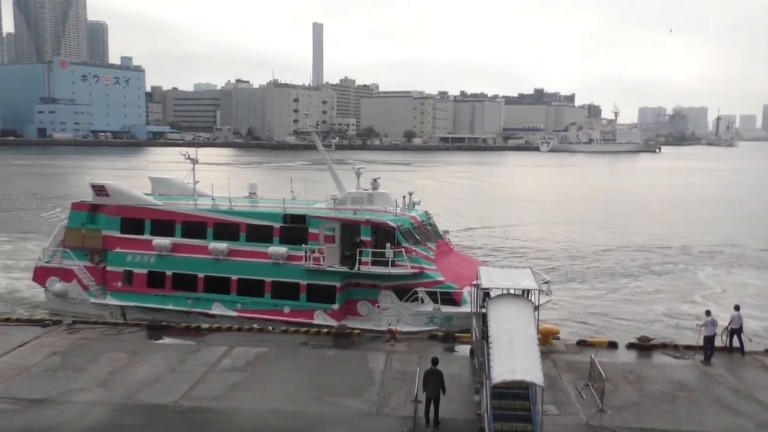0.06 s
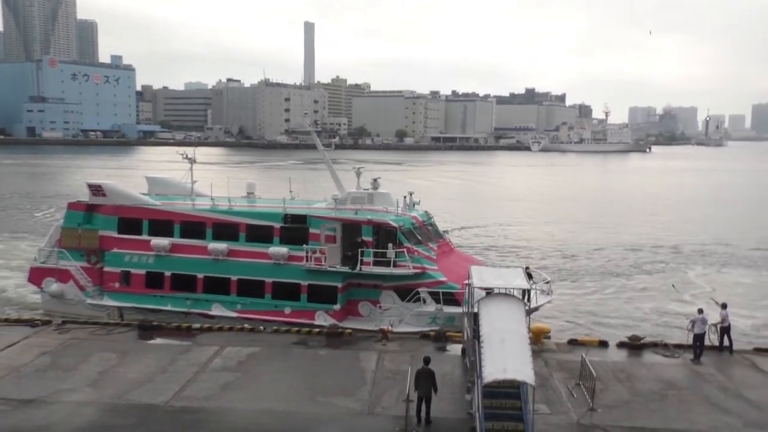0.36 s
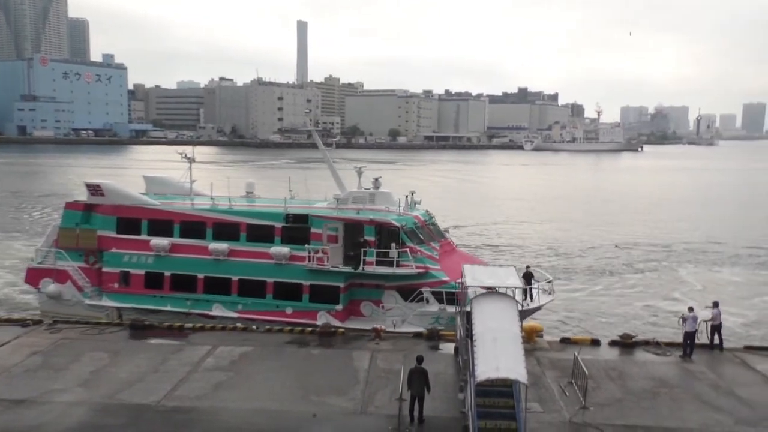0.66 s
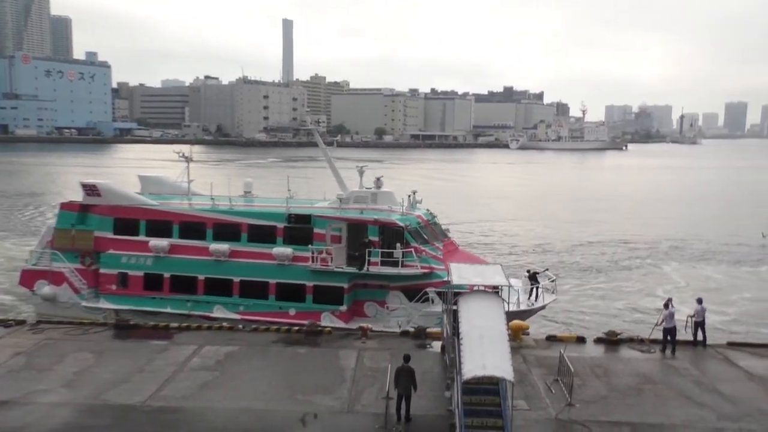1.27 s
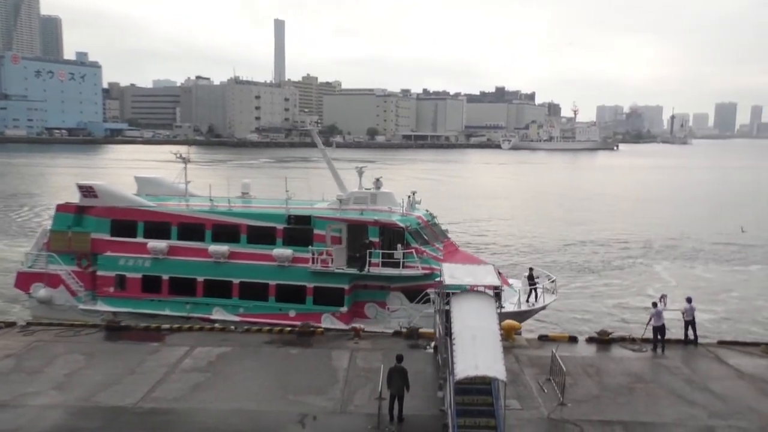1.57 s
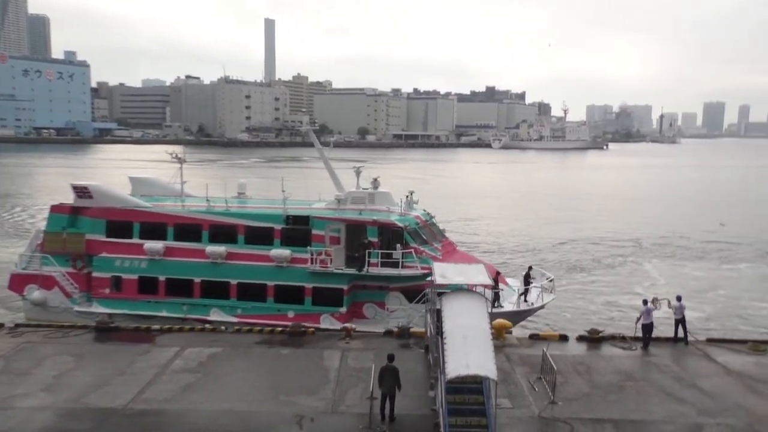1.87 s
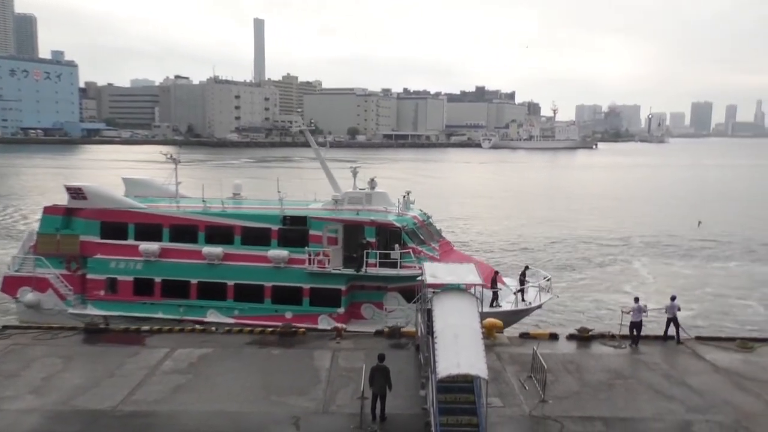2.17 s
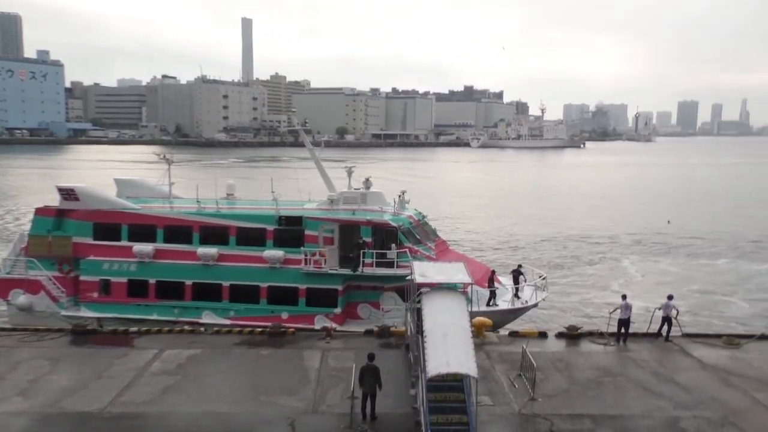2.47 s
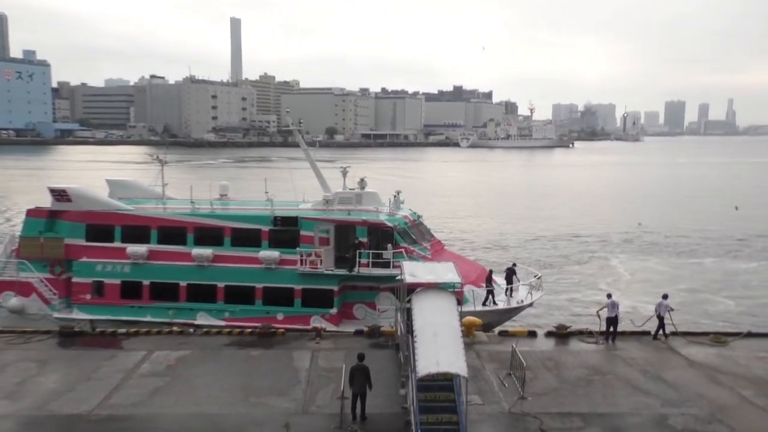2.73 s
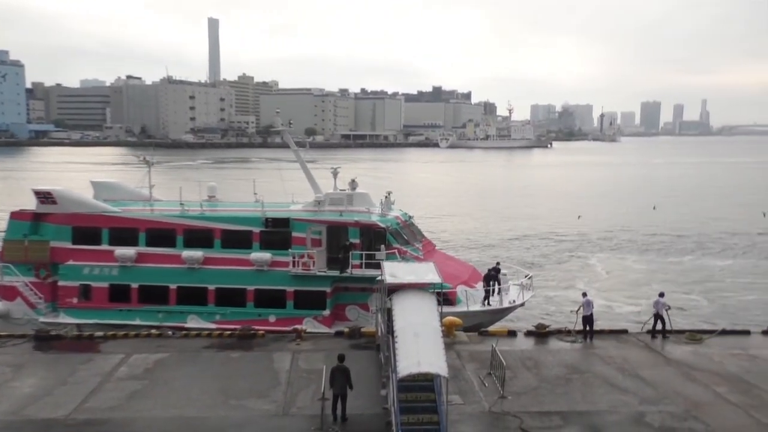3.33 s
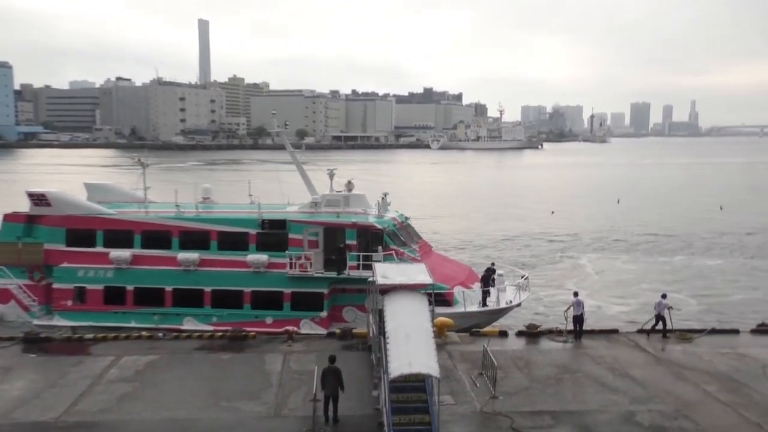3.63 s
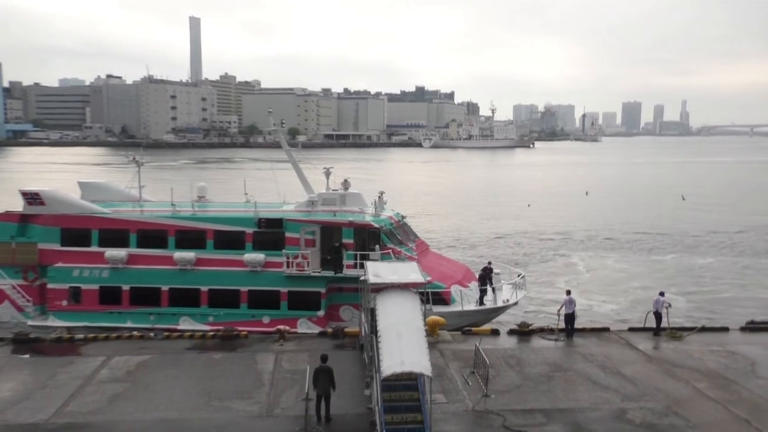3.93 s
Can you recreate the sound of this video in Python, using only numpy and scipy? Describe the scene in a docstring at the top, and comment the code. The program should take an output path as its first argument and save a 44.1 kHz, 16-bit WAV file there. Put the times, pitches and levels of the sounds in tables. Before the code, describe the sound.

The loud roar of a ferry engine carries up from an open harbour pier, with rushing hiss, low hum and a high turbine whine throughout. The exhaust surges briefly, then a wandering drone rises twice out of the roar.

```python
"""A gas-turbine ferry manoeuvres beside a harbour pier, heard from a terrace above it.
From the start the ducts roar, the exhaust rumbles and the intake hisses, with a weak wall echo.
Throughout, machinery hums and the compressor whines at shaft multiples, fluttering in moving air.
At 0.2 s a wandering duct drone swells; the exhaust surges near 1.2 s, its deep rumble near 1.8 s.
The drone rises out of the roar again at 3.2 s and 3.8 s."""
import sys
import numpy as np
from scipy import signal
from scipy.fft import rfft, irfft, next_fast_len
from scipy.io import wavfile
from scipy.ndimage import uniform_filter1d, map_coordinates

SR = 44100
rng = np.random.default_rng(int(sys.argv[2]) if len(sys.argv) > 2 else 0)


def wav_record(signal):
    """Record a signal, one row per channel, as 16-bit PCM in the file named by sys.argv[1]."""
    frames = np.transpose(np.atleast_2d(signal))
    bounded = np.clip(frames, -1, 1)
    # unit amplitude maps onto the largest positive 16-bit level
    quanta = np.round(bounded * 32767).astype(np.int16)
    wavfile.write(sys.argv[1], SR, quanta)


N = 176400


def amp(db):
    """Decibels to gain."""
    return 10 ** (np.asarray(db) / 20)


def unit(x):
    """Scale to rms 1."""
    return x / np.sqrt(np.mean(np.abs(x) ** 2) + 1e-20)


def along(points, hz):
    """Interpolate (hz, value) points on a log axis."""
    knots_hz, values = np.transpose(points)
    return np.interp(np.log(hz + 1), np.log(knots_hz + 1), values)


def curve(points):
    """Interpolate (time_s, value) points per sample."""
    return np.interp(np.arange(N) / SR, *np.transpose(points))


def wobble(knots_per_s):
    """Smooth random curve."""
    knots = rng.standard_normal(int(N * knots_per_s / SR) + 4)
    return map_coordinates(knots, [np.arange(N) * knots_per_s / SR])


def filtered(x, response):
    """Apply a frequency response."""
    size = next_fast_len(N + SR // 2)
    return irfft(rfft(x, size) * response(np.fft.rfftfreq(size, 1 / SR)), size)[..., :N]


def pan(left_minus_right_db):
    """Left and right gains."""
    return amp(np.array([[.5], [-.5]]) * left_minus_right_db)


def flutter(half_width_hz, coherence):
    """Random complex stereo gain of a tone scattered by moving air."""
    hz = np.abs(np.fft.fftfreq(N, 1 / SR))
    skirt = 1 / np.sqrt(1 + (hz / half_width_hz) ** 3.16)
    mid, side = np.fft.ifft(skirt * np.exp(2j * np.pi * rng.random((2, N))))
    spread_rad = np.arccos(coherence) / 2
    return unit(np.cos(spread_rad) * mid + np.sin(spread_rad) * np.array([side, -side]))


# Likeness of the two channels: freq_hz, coherence
COHERENCE = [(60, .98), (150, .955), (270, .905), (590, .865), (1260, .85), (2700, .85), (5800, .82),
             (12000, .75)]
# Stereo balance: freq_hz, left_minus_right_db
BALANCE_DB = [(60, .5), (200, 0), (640, 1.5), (1160, 2), (2100, 1.5), (3500, 1.5), (4400, 4.5), (5400, 2),
              (6400, 1), (7200, -1), (8100, 7.5), (10000, 1)]
def turbulence(spectrum, patchy_db, resonances=()):
    """Turbulent stereo noise, rms 1, with patches of random gain in time and frequency."""
    def mid_side_response(hz):
        peaks_db = sum(db / (1 + (2 * (hz - centre_hz) / width_hz) ** 2)
                       for centre_hz, width_hz, db in resonances)
        spread_rad = np.arccos(along(COHERENCE, hz)) / 2
        return amp(along(spectrum, hz) + peaks_db) * [np.cos(spread_rad), np.sin(spread_rad)]

    bins = signal.stft(rng.standard_normal((2, N)), nperseg=512)[2]
    patches = uniform_filter1d(rng.standard_normal(bins.shape[1:]), size=6, axis=0)
    patches = uniform_filter1d(patches, size=16, axis=1)
    noise = signal.istft(bins * amp(patchy_db * unit(patches)), nperseg=512)[1][:, :N]
    mid, side = filtered(noise, mid_side_response)
    stereo = np.array([mid + side, mid - side])
    return unit(filtered(stereo, lambda hz: pan(along(BALANCE_DB, hz))))


# Roar spectrum: freq_hz, relative_db
ROAR_SPECTRUM = [(150, -11), (300, -5.5), (425, -4.5), (480, 0), (660, 1), (730, -3), (980, -3), (1200, -6),
                 (1380, -5), (1650, -4.5), (1950, -5.5), (2400, -9), (2850, -14.5), (3600, -20.5),
                 (6000, -38), (12000, -70)]
# Duct resonances: centre_hz, width_hz, boost_db
DUCT_RESONANCES = [(610, 160, 0.5), (1098, 64, 5.5), (1502, 130, 2.8)]
# Roar envelope: time_s, level_db
ROAR_DB = [(0, -21), (.35, -20.5), (.55, -21.5), (.76, -20), (.92, -22), (1.15, -20), (1.35, -20.5),
           (2, -20.5), (2.4, -20.5), (2.6, -22), (2.9, -20.5), (3.12, -20.5), (3.21, -23.5), (3.33, -20.5),
           (3.53, -20.5), (3.65, -22), (4, -22)]
def duct_roar():
    """Gas flow roars through ducts with a few broad resonances."""
    level_db = curve(ROAR_DB) + 0.21 * wobble(9)
    return amp(level_db) * turbulence(ROAR_SPECTRUM, patchy_db=0.39, resonances=DUCT_RESONANCES)


# Exhaust spectra: freq_hz, relative_db
RUMBLE_SPECTRUM = [(8, -20), (22, -18), (33, -4.5), (46, -2), (78, 0), (96, -6), (125, -16), (200, -26),
                   (900, -67)]
BODY_SPECTRUM = [(50, -48), (95, -7.5), (118, -2), (150, -2.5), (185, -0.5), (240, -1.5), (272, -12),
                 (400, -18.5), (900, -57)]
# Exhaust envelopes: time_s, level_db
RUMBLE_DB = [(0, -27.5), (.8, -25), (1.05, -28.5), (1.35, -25), (1.6, -27), (1.78, -23), (1.95, -29),
             (2.5, -30), (2.75, -28), (3.1, -25), (4, -30.5)]
BODY_DB = [(0, -26), (.35, -25), (.62, -27.5), (.78, -21.5), (.9, -27.5), (1.15, -20), (1.3, -25.5),
           (2.05, -24.5), (2.6, -23.5), (2.8, -29.5), (2.93, -22.5), (3.14, -24.5), (3.35, -27.5),
           (3.7, -22.5), (3.85, -27.5), (4, -22)]
def exhaust():
    """Turbulent exhaust: a deep rumble under a surging body."""
    rumble = amp(curve(RUMBLE_DB)) * turbulence(RUMBLE_SPECTRUM, patchy_db=1.0)
    body = amp(curve(BODY_DB)) * turbulence(BODY_SPECTRUM, patchy_db=0.15)
    return rumble + body


# Turbine shaft: time_s, speed_hz
SHAFT_HZ = [(0, 173.5), (.4, 173.5), (.8, 173.27), (1.3, 173.3), (2, 173.05), (2.5, 173.3), (4, 173.12)]
def shaft_tone(multiple, scatter_share, half_width_hz):
    """One shaft harmonic, rms 1, its power split into direct and air-scattered parts."""
    phase = 2 * np.pi * (multiple * np.cumsum(curve(SHAFT_HZ)) / SR + rng.random())
    waver_rad = 0.23 * wobble(12)
    direct = np.sqrt(1 - scatter_share) * np.exp(1j * waver_rad)
    scattered = np.sqrt(scatter_share) * flutter(half_width_hz, coherence=1.0)
    return np.sqrt(2) * np.real(np.exp(1j * phase) * (direct + scattered))


# Blade tone envelope: time_s, relative_db
BLADE_DB = [(0, -40.5), (.18, -25.5), (.36, -30.5), (.46, -24.5), (.56, -42), (.63, -26), (.69, -41),
            (.81, -26), (.89, -34), (1.17, -28.5), (1.3, -35.5), (1.45, -35.5), (1.51, -27), (1.77, -36.5),
            (2.16, -42.5), (2.22, -26), (2.27, -36), (2.44, -27), (2.67, -26.5), (2.72, -31), (2.87, -30),
            (3.1, -32.5), (3.16, -25.5), (3.21, -35), (3.3, -34), (3.41, -23.5), (3.52, -32.5),
            (3.57, -23.5), (3.64, -30), (3.72, -25), (3.76, -38), (3.8, -29), (4, -31.5)]
# Upper tone envelopes: time_s, level_db
OCTAVE_DB = [(0, -51.5), (1.1, -53.5), (2.05, -52.5), (2.5, -51), (2.95, -49.5), (3.25, -52), (3.55, -47),
             (4, -51)]
WHISTLE_DB = [(0, -44), (.28, -42.5), (.42, -49), (.75, -50), (.88, -42), (1.08, -47), (1.2, -39.5),
              (1.4, -52), (1.75, -45), (2.55, -42), (2.72, -50), (2.87, -43), (3.2, -52), (3.5, -47.5),
              (3.68, -43), (3.85, -39), (4, -46)]
# Weak tones: shaft_multiple
WEAK_MULTIPLES = [24, 27, 29, 35, 37, 39, 43, 44]
# Weak tones, same order: level_db, left_minus_right_db
WEAK_MIX_DB = [(-68, 3), (-60, -3), (-52.5, 4), (-59, 3), (-48, -5), (-52, 0), (-62, -2.5), (-63, 1)]
def compressor(blades=33):
    """The blade tone fades in and out of its scattered halo, among weaker shaft harmonics."""
    blade_db = curve(BLADE_DB)
    halo_db = -33 + 0.18 * (blade_db - blade_db.mean())
    direct = amp(blade_db - 0.5) * shaft_tone(blades, scatter_share=0.034, half_width_hz=38)
    halo = amp(halo_db) * shaft_tone(blades, scatter_share=0.96, half_width_hz=38.3)
    octave = amp(curve(OCTAVE_DB)) * shaft_tone(2 * blades, scatter_share=0.91, half_width_hz=52)
    whistle = amp(curve(WHISTLE_DB)) * shaft_tone(41, scatter_share=0.67, half_width_hz=16)
    whine = pan(5.5) * (direct + halo) + pan(-0.5) * octave + whistle
    for multiple, (level_db, pan_db) in zip(WEAK_MULTIPLES, WEAK_MIX_DB):
        gain = amp(level_db + 1.5 * wobble(6.4)) * pan(pan_db)
        whine += gain * shaft_tone(multiple, scatter_share=0.75, half_width_hz=13)
    return whine


# Drone envelope: time_s, level_db
DRONE_DB = [(0, -29.5), (.17, -27), (.4, -33.5), (.65, -34.5), (.8, -30), (1.02, -37), (1.7, -39),
            (2.3, -33), (2.6, -37), (2.97, -33), (3.17, -27), (3.5, -34.5), (3.63, -30), (3.82, -26.5),
            (4, -44)]
# Drone glide: time_s, pitch_hz
DRONE_HZ = [(0, 613.4), (.15, 597.4), (.8, 612), (2, 612.8), (2.4, 596), (2.8, 628), (2.97, 602),
            (3.3, 634.4), (3.5, 631), (3.63, 596), (3.78, 630), (4, 609)]
def duct_drone(noise_share=0.45, wander_hz=5.08):
    """The main duct resonance sings as a rough, wandering tone."""
    pitch_hz = curve(DRONE_HZ) + wander_hz * wobble(14)
    phase = 2 * np.pi * (np.cumsum(pitch_hz) / SR + rng.random())
    rough = np.sqrt(1 - noise_share) + np.sqrt(noise_share) * flutter(half_width_hz=42, coherence=0.8)
    tone = np.sqrt(2) * np.real(rough * np.exp(1j * phase))
    return amp(curve(DRONE_DB)) * pan(2) * tone


# Hiss spectrum: freq_hz, relative_db
HISS_SPECTRUM = [(1500, -10.5), (3300, 1), (4400, 0), (5400, 1), (6600, 0.5), (7300, -5), (7900, -6),
                 (8500, -12.5), (9050, -13.5), (9800, -22.5), (11300, -22.5), (12100, -49)]
# Hiss envelope: time_s, level_db
HISS_DB = [(0, -32.7), (.2, -31.5), (.55, -33.4), (1.35, -32.5), (1.52, -33.6), (1.75, -32.7),
           (2.35, -32.6), (2.7, -33), (3.08, -32.5), (3.2, -35.5), (3.53, -32), (3.75, -33), (4, -33)]
def intake_hiss():
    """Air rushes into the intake."""
    return amp(curve(HISS_DB)) * turbulence(HISS_SPECTRUM, patchy_db=0.5)


# Machinery tones: pitch_hz, level_db, half_width_hz
HUM_TONES = [(60.8, -37.5, 0.97), (183.9, -38.5, 3.8), (241.1, -39, 6.3), (765, -40, 3.2), (907, -37, 18)]
def machinery_hum(fade_db=2):
    """Low machinery tones swell and fade at random."""
    time_s = np.arange(N) / SR
    hum = np.zeros((2, N))
    for pitch_hz, level_db, half_width_hz in HUM_TONES:
        gain = amp(level_db + fade_db * wobble(6.04)) * pan(along(BALANCE_DB, pitch_hz))
        unsteady = flutter(half_width_hz, along(COHERENCE, pitch_hz))
        hum += gain * np.sqrt(2) * np.real(unsteady * np.exp(2j * np.pi * pitch_hz * time_s))
    return hum


def wall_echo(x, delay_s=0.0322, gain_db=-15.5, corner_hz=600):
    """A terminal wall reflects the lows and scatters the highs away."""
    reflection = lambda hz: amp(gain_db) / (1 + (hz / corner_hz) ** 2)
    return filtered(x, lambda hz: reflection(hz) * np.exp(-2j * np.pi * hz * delay_s))


def scene():
    """Flow noise and its echo, with the tones on top."""
    flow = exhaust() + duct_roar() + intake_hiss()
    return flow + wall_echo(flow) + duct_drone() + machinery_hum() + compressor()


# Phase between microphone ports: freq_hz, left_lead_rad
PORT_LEAD_RAD = [(60, -0.05), (900, 0.04), (2670, 0.1), (3450, 0.6), (3880, -0.1), (4650, -0.3),
                 (5250, -0.4), (6460, -0.6), (7920, 0.8), (8530, 0.7), (9130, -.4), (9650, 0),
                 (11400, 0.34)]
def record(dry):
    """Two microphone ports shift phase against each other; a band limit cuts the top."""
    cutoff_hz = 12300
    ports = lambda hz: np.exp(1j * np.array([[.5], [-.5]]) * along(PORT_LEAD_RAD, hz))
    return filtered(dry, lambda hz: ports(hz) * (hz < cutoff_hz))


dry = scene()
out = record(dry)
wav_record(out)
```